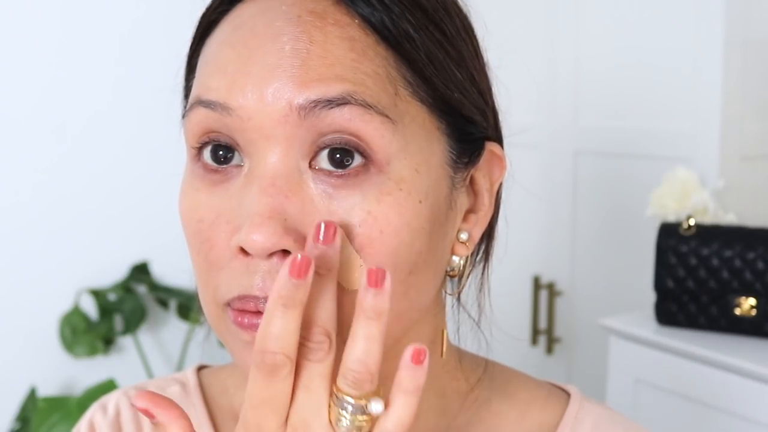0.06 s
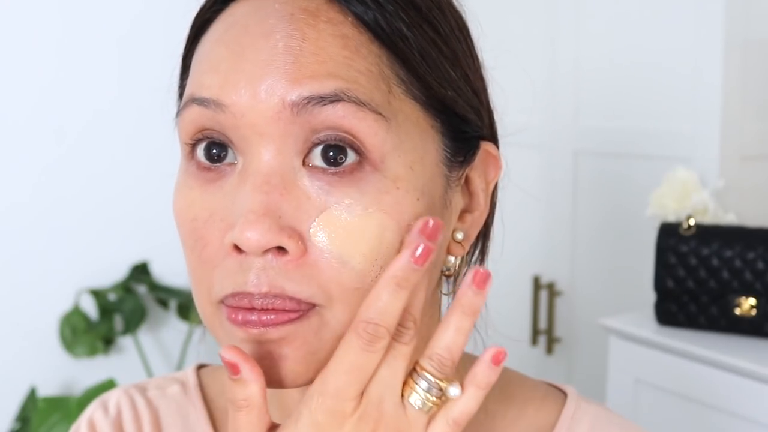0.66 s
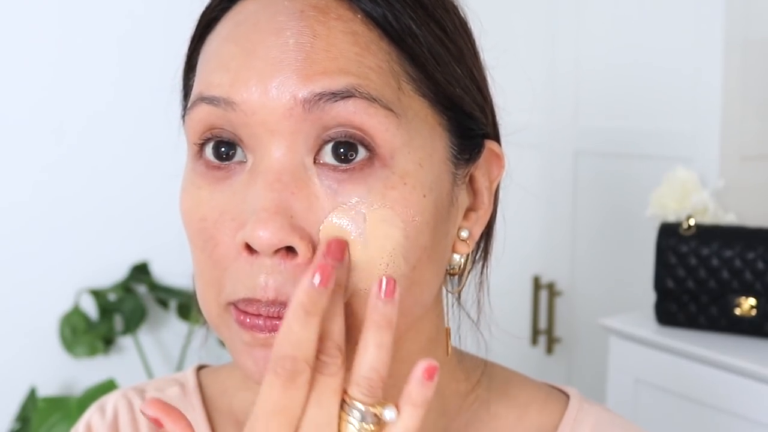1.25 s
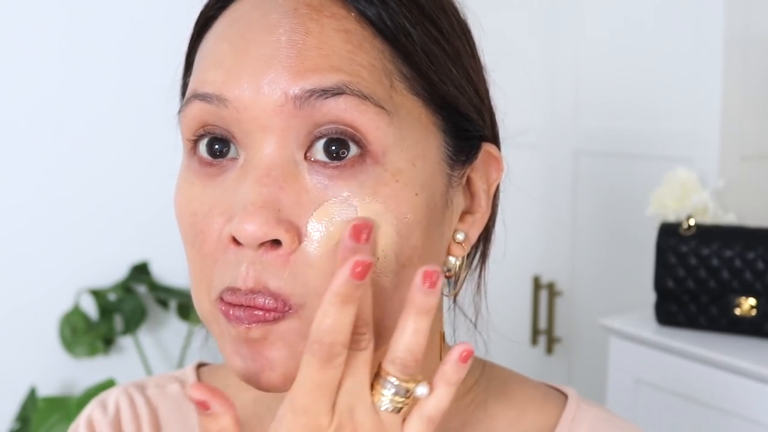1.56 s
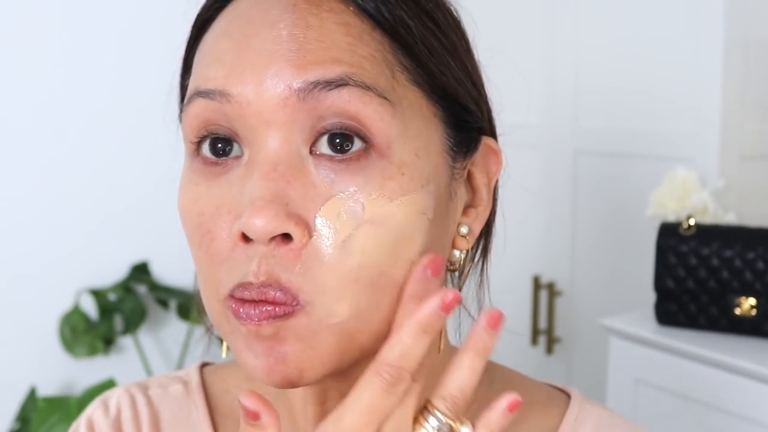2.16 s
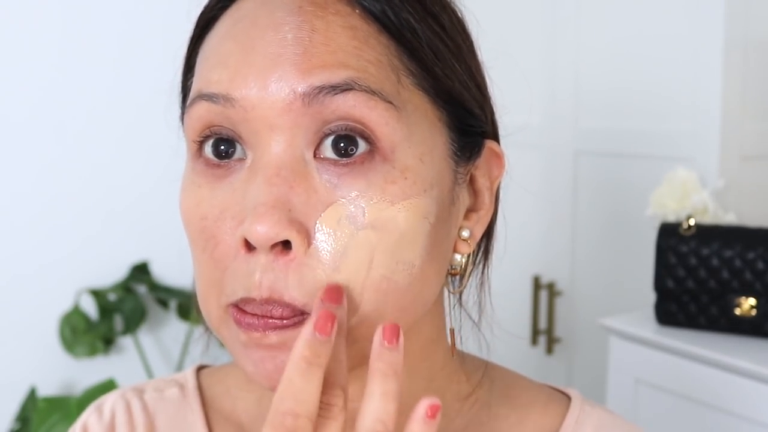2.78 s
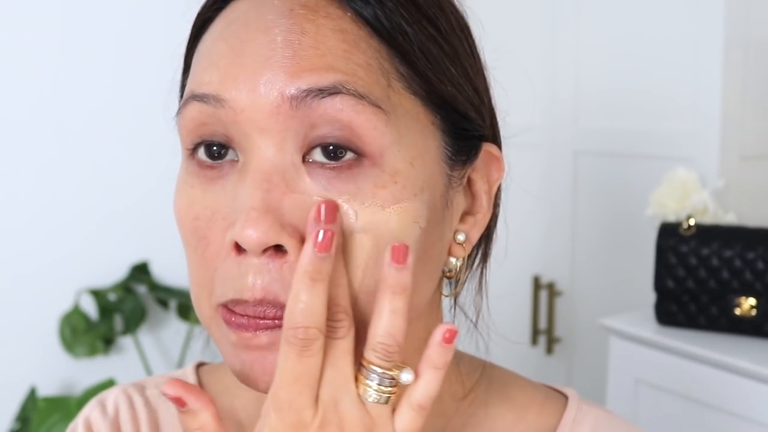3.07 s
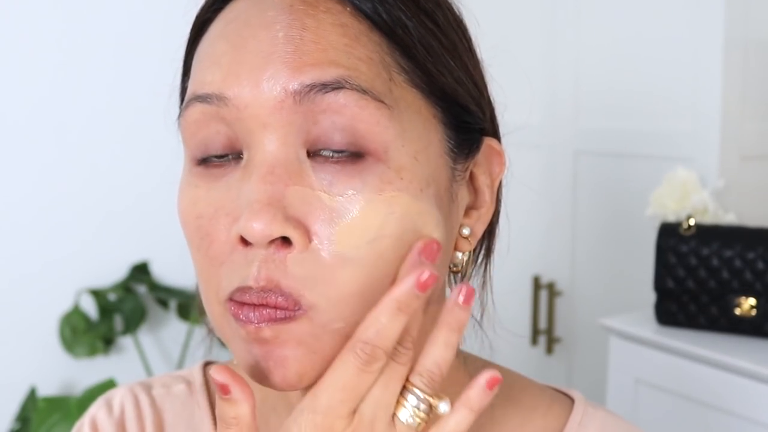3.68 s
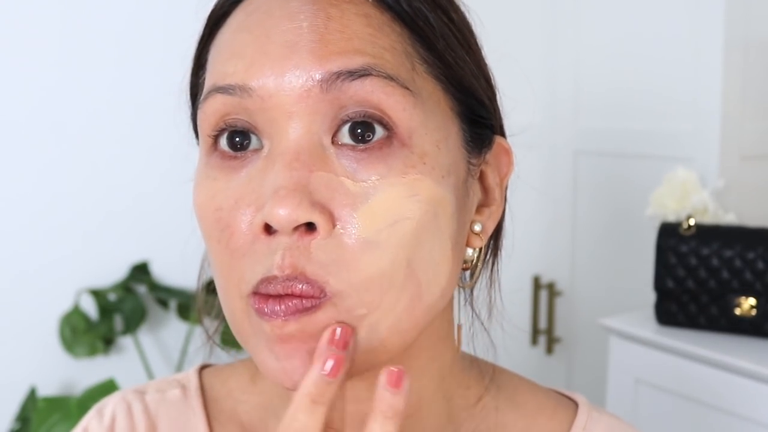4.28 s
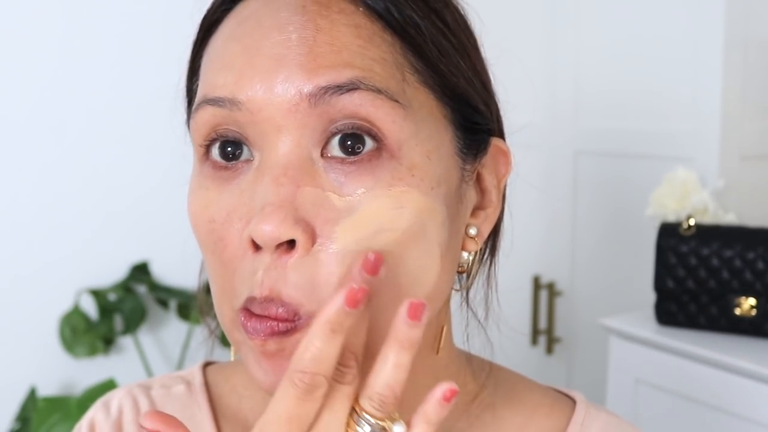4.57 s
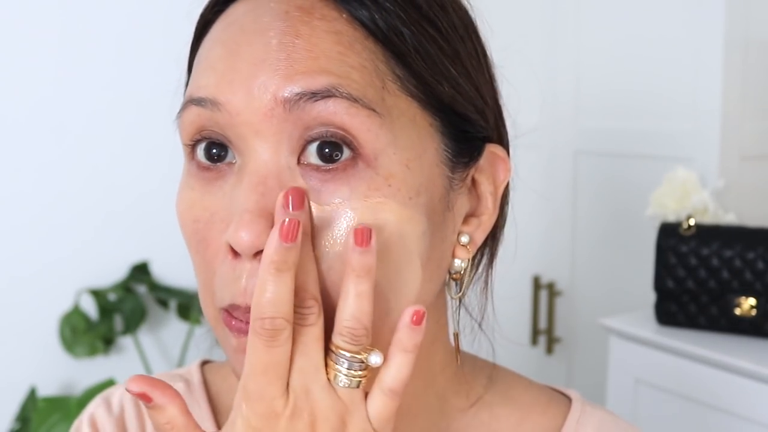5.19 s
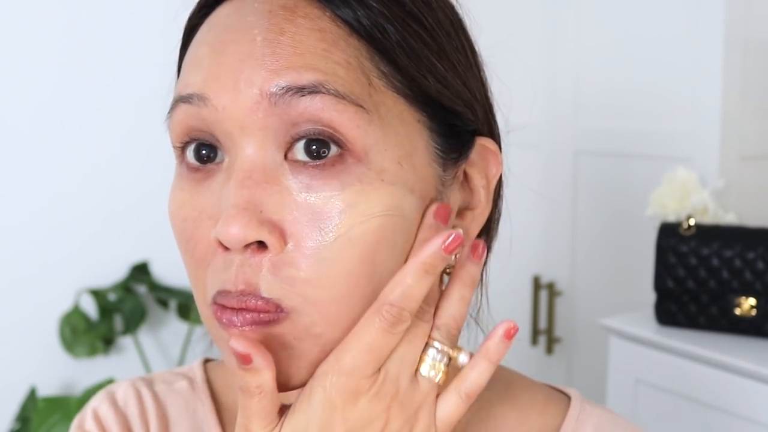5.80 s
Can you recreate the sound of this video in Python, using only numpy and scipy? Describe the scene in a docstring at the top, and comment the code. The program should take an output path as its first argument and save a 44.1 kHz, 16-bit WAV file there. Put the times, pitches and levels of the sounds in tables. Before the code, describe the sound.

A small bottle clicks, scrapes and knocks on a table, then fingertips rub very faintly on skin over a low hum.

```python
"""A small, quiet room, close up: fingertips spread liquid foundation over a cheek.
First, something like a small bottle slides, clicks and bumps on the dressing table; both ring in
damped modes. Then soft strokes hiss on the skin, louder as the hand moves faster, with a few tiny
ticks and squeaks. An appliance hums low under a faint hiss."""
import sys
import numpy as np
from scipy import signal
from scipy.fft import rfft, irfft
from scipy.io import wavfile

SR = 44100
rng = np.random.default_rng(int(sys.argv[2]) if len(sys.argv) > 2 else 0)


def persist_wave(psi):
    """Save psi, clipped to +-1, as 16-bit WAV."""
    counts = np.round(np.clip(psi, -1, 1) * 32767).astype(np.int16)
    wavfile.write(sys.argv[1], SR, np.atleast_2d(counts).T)


N = 257544
T = np.arange(N) / SR
FREQS_HZ = np.fft.rfftfreq(N, 1 / SR) + 1e-3

# Appliance hum. Each row: frequency in Hz, level in dB.
HUM_PARTIALS = [(59.2, -55.5), (118.4, -71)]
# Noise spectra. Each row: frequency in Hz, relative density in dB.
AIR_SPECTRUM = [(76, -29.5), (130, -3), (320, -4.5), (497, -9), (803, -12.5), (1150, -15.5), (1970, -16.5),
                (2720, -16.5), (2890, -15), (3530, -20), (4220, -18), (5370, -20), (15500, -23.5)]
SKIN_SPECTRUM = [(200, -3), (500, -7), (1200, 2), (2000, -3), (3200, -3), (5000, -3), (8000, -5.5),
                 (13000, -9.5), (16000, -20)]
ROOM_RUMBLE_SPECTRUM = [(20, -12), (60, 2), (130, -4), (300, -9.5), (900, -48.5)]
CHANNEL_HISS_SPECTRUM = [(30, 14), (150, 10), (600, 5), (2500, -5.5), (14000, -2)]
TABLE_RUMBLE_SPECTRUM = [(30, -17), (80, -4.5), (170, -16), (300, -30), (900, -20.5), (2000, -32.5)]
# Room decay. Each row: band centre in Hz, T60 in seconds, gain in dB.
ROOM_BANDS = [(90.2, .45, -3.5), (200.6, .35, -5), (455.3, 0.4, -4.5), (800, 0.55, -3.5),
              (1300, 0.36, -5.5), (1900, 0.37, -13), (2980, 0.5, -11.5), (4603, 0.44, -18.5),
              (6497, 0.33, -20.5), (13000, 0.24, -22.5)]
# Modes of table top and bottle. Each row: frequency in Hz, relative level in dB, T60 in seconds.
TABLE_MODES = [(75.4, -13, 0.3), (106, -6, 0.11), (136, -7, 0.13), (178.84, -4.5, 0.14),
               (234.7, -25.5, 0.31), (336.3, -3.5, 0.022), (403, 3, 0.016), (510, -9, .016),
               (719, -8, 0.0083), (1061, -13.5, .008)]
BOTTLE_MODES = [(1390, -23, .02), (1850, -16, 0.033), (2447, -23, .012), (3080, 2, .009), (3584, 9, 0.0074),
                (4254, 1.5, .005), (4930, -10.5, 0.0043), (7040, -7.5, 0.014), (12470, -25.5, .008),
                (14100, -38.5, .02)]
# Blows on the table. Each row: start in seconds, gain in dB, contact in seconds, relative room send in dB.
TABLE_BUMPS = [(0.079, -36.5, 0.0033, -11), (0.282, -13.5, 0.0039, -16.5), (0.552, 0.5, 0.001, -13.5),
               (0.7067, -9.5, 0.0042, -14.5), (3.5293, -47, .0005, -6.5)]
# Resonances of the dragged bottle. Each row: centre in Hz, width in Hz, relative gain in dB.
SCRAPE_BANDS = [(1400, 400, -11.5), (1847, 150, 2), (2971, 440, -2), (3650, 500, -5.5), (4700, 530, -2.5),
                (6456, 690, 0), (7650, 980, -6)]
# Tone of the scrape. Each row: frequency in Hz, relative gain in dB.
SCRAPE_EQ = [(500, -12.5), (1600, -1.5), (8000, 2.5), (9500, 4.5), (15000, -2)]
# Drags of the bottle's base. Each row: start in seconds, length in seconds, midpoint level in dB,
# trend in dB per second, tilt in dB per octave, attack in seconds.
BOTTLE_SLIDES = [(0, 0.3, -57.5, 11, -5.5, 0.013), (0.479, 0.081, -32.5, 215, -1.1, .018),
                 (.662, 0.19, -43, -84, 0.5, 0.062)]
# Hard clicks of the bottle. Each row: start in seconds, peak level in dB.
BOTTLE_CLICKS = [(0.2639, -28), (0.2655, -22.5), (0.2681, -8), (0.2702, -15.5), (0.27, -25)]
# Ticks of nails, rings and sticky skin. Each row: start in seconds, gain in dB, resonance in Hz,
# width in Hz, relative crack gain in dB.
FINGER_TICKS = [(0.9682, -59.5, 4687, 1498, -4.5), (2.1106, -51, 12670, 400, 2),
                (2.375, -62, 12500, 1500, -1), (2.742, -60, 5000, 2000, -3),
                (3.5303, -44.5, 1148, 500, -28), (3.638, -46, 2750, 700, -26), (3.664, -51, 13400, 2000, 5),
                (3.9588, -52, 13200, 500, 6), (4.2767, -49, 6430, 250, -3), (4.279, -51.5, 12500, 300, 6)]
# Faint squeaks. Each row: start in seconds, length in seconds, pitch in Hz, level in dB.
SKIN_SQUEAKS = [(1.85, 0.12, 1280, -63.5), (1.86, 0.11, 520, -64), (5.645, 0.038, 1306, -61),
                (5.71, 0.083, 1350, -64.5), (5.802, 0.046, 1260, -64)]
# Strokes on the cheek. Each row: start in seconds, length in seconds, level in dB, relative drag in dB.
FINGER_STROKES = [(.85, .14, -75, -1), (0.958, 0.15, -66.5, -2.5), (1.17, 0.28, -69, 0),
                  (1.467, 0.13, -70, -3), (1.573, .28, -58, -3), (1.835, 0.19, -63, -.5),
                  (1.993, 0.29, -64, -2), (2.337, 0.2, -67.5, -2.5), (2.599, 0.21, -72, -2),
                  (2.81, 0.17, -65, -2.5), (3.002, .11, -76.5, -2), (3.173, 0.16, -65, -3.5),
                  (3.381, .21, -65.5, -1.5), (3.616, 0.12, -64.5, -2), (3.7, 0.19, -64.5, -1.5),
                  (3.919, .27, -61.5, -3), (4.27, 0.28, -72.5, -8), (4.49, 0.13, -64, 1.5),
                  (4.55, .18, -64, -1.5), (4.767, 0.097, -70.5, 2.5), (4.991, 0.062, -62, 0.5),
                  (5.019, .13, -64.5, -4.5), (5.383, .3, -62.5, -3), (5.755, .2, -67.5, 1.5)]


def undb(db):
    """Decibels to gain."""
    return 10 ** (np.asarray(db) / 20)


def unit(x):
    """Scale to unit RMS."""
    return x / np.sqrt(np.mean(x ** 2))


def colour(x, points):
    """Filter by a curve of (Hz, dB) points, then scale to unit RMS."""
    hz, db = np.transpose(points)
    gain = undb(np.interp(np.log(FREQS_HZ), np.log(hz), db))
    return unit(irfft(rfft(x) * gain, N))


def resonate(x, hz, width_hz):
    """One resonance, unity gain at its centre."""
    return signal.lfilter(*signal.iirpeak(hz, hz / width_hz, fs=SR), x)


def ring(hz, t60_s):
    """A struck mode; the longer its decay, the slower its onset."""
    t = T[:SR // 2]
    swell = 1 - np.exp(-t / (0.018 * t60_s))
    return -np.cos(2 * np.pi * hz * t) * swell * np.exp(-np.log(1000) * t / t60_s)


def add(track, start_s, sound):
    """Mix a sound into the track."""
    start = int(start_s * SR)
    track[start:start + len(sound)] += sound[:N - start]


def friction(spread_db):
    """Tiny slips of unequal size: noise with a new random level every 32 samples."""
    noise = rng.standard_normal(N)
    slip_db = spread_db * np.repeat(rng.standard_normal(N // 32 + 1), 32)[:N]
    return unit(noise * undb(slip_db))


def hand_speed(start_s, length_s):
    """One movement: a half sine from rest to 1 and back."""
    phase = np.interp(T, [start_s, start_s + length_s / 2, start_s + length_s], [0, 1, 0])
    return np.sin(np.pi / 2 * phase)


def background():
    """Appliance hum, room air and rumble; each channel adds its own hiss."""
    hum = sum(undb(db) * np.sqrt(2) * np.sin(2 * np.pi * hz * T + rng.uniform(0, 2 * np.pi))
              for hz, db in HUM_PARTIALS)
    air = undb(-63) * colour(rng.standard_normal(N), AIR_SPECTRUM)
    rumble = undb(-70.5) * colour(rng.standard_normal(N), ROOM_RUMBLE_SPECTRUM)
    hiss = [colour(rng.standard_normal(N), CHANNEL_HISS_SPECTRUM) for _ in range(2)]
    return hum + air + rumble + undb(-67.5) * np.array(hiss)


def room(x, predelay_s=0.005, build_s=0.0034):
    """Diffuse wall echoes: a fresh noise response, each band with its own decay."""
    hz, t60_s, db = np.transpose(ROOM_BANDS)
    spectrum, t = rfft(rng.standard_normal(N)), T[:SR]
    response = 0
    for k, share in enumerate(np.eye(len(hz))):
        band = irfft(spectrum * np.interp(np.log(FREQS_HZ), np.log(hz), share), N)[:SR]
        decay_per_s = np.log(1000) / t60_s[k]
        envelope = np.exp(-decay_per_s * t) * np.sqrt(2 * decay_per_s / SR)  # unit energy
        response += undb(db[k]) * band * envelope
    arrival = np.clip((t - predelay_s) / build_s, 0, 1)
    return signal.fftconvolve(x, response * arrival)[:N]


def table_bumps():
    """Blows ring the table top; longer contact leaves only low modes. Returns direct sound, room send."""
    direct, send = np.zeros(N), np.zeros(N)
    top = sum(undb(db) * ring(hz, t60_s) for hz, db, t60_s in TABLE_MODES)
    # A small board radiates no deep bass.
    top = signal.sosfilt(signal.butter(4, 55, "high", fs=SR, output="sos"), top)
    for start_s, db, contact_s, send_db in TABLE_BUMPS:
        force = np.sin(np.pi * np.minimum(T[:SR // 50] / contact_s, 1)) ** 2
        thud = undb(db) * signal.fftconvolve(top, force / force.sum())
        add(direct, start_s, thud)
        add(send, start_s, thud * undb(send_db))
    return direct, send


def bottle_slides(release_share=0.14):
    """Slips of the base excite the bottle and rumble in the table; each slide swells or fades."""
    slips = friction(spread_db=2.5)
    rumble = undb(-13) * colour(friction(spread_db=9.5), TABLE_RUMBLE_SPECTRUM)
    out = np.zeros(N)
    for start_s, length_s, mid_db, trend_db_per_s, tilt_db_per_oct, attack_s in BOTTLE_SLIDES:
        scrape = 0
        for k, (hz, width_hz, db) in enumerate(SCRAPE_BANDS):
            gain = undb(db + tilt_db_per_oct * np.log2(hz / 4500))
            scrape += (-1) ** k * gain * resonate(slips, hz, width_hz)
        age_s = np.clip(T - start_s, 0, length_s)
        attack = np.minimum(age_s / attack_s, 1) ** 2
        release = np.clip((start_s + length_s - T) / (release_share * length_s), 0, 1)
        level = undb(mid_db + trend_db_per_s * (age_s - length_s / 2))
        out += attack * release * level * (colour(scrape, SCRAPE_EQ) + rumble)
    return out


def bottle_clicks():
    """The bottle chatters against something hard; each hit rings its modes."""
    out = np.zeros(N)
    body = sum(undb(db) * ring(hz, t60_s) for hz, db, t60_s in BOTTLE_MODES)
    for start_s, db in BOTTLE_CLICKS:
        add(out, start_s, undb(db) * body / np.abs(body).max())
    return out


def finger_ticks(decay_s=0.003):
    """Each tick is a short crack that excites one damped resonance."""
    out, t = np.zeros(N), T[:SR // 4]
    for start_s, db, hz, width_hz, crack_db in FINGER_TICKS:
        burst = rng.standard_normal(len(t)) * np.exp(-t / decay_s)
        body = resonate(burst, hz, width_hz) * np.sqrt(SR / (np.pi * width_hz))
        crack = undb(crack_db) * resonate(burst, hz=4400, width_hz=6200)
        add(out, start_s, undb(db) * (body + crack))
    return out


def skin_squeaks(width_hz=130):
    """Wavering squeaks, perhaps of skin catching: slips in a narrow resonance."""
    slips = friction(spread_db=2)
    out = np.zeros(N)
    for start_s, length_s, hz, db in SKIN_SQUEAKS:
        tone = unit(resonate(resonate(slips, hz, width_hz), hz, width_hz))
        out += undb(db) * hand_speed(start_s, length_s) * tone
    return out


def finger_strokes(speed_exponent=0.75, rest_db=-77, rest_drag_db=-3):
    """Wet fingertips hiss on the cheek, louder with speed; firmer drag lifts a band near 3 kHz."""
    hiss_power = np.full(N, undb(rest_db) ** 2)  # light contact between strokes
    drag_power = hiss_power * undb(rest_drag_db) ** 2
    for start_s, length_s, db, drag_db in FINGER_STROKES:
        power = (undb(db) * hand_speed(start_s, length_s) ** speed_exponent) ** 2
        hiss_power += power
        drag_power += power * undb(drag_db) ** 2
    hiss = colour(friction(spread_db=0.5), SKIN_SPECTRUM)
    drag = resonate(friction(spread_db=1), hz=2890, width_hz=1100)
    drag = unit(resonate(drag, hz=3130, width_hz=1500))
    return np.sqrt(hiss_power) * hiss + np.sqrt(drag_power) * drag


def scene():
    """Bottle and fingers, close and centred, over the background; the echoes spread a little."""
    bumps, bump_send = table_bumps()
    clicks, slides = bottle_clicks(), bottle_slides()
    fingers = finger_strokes() + skin_squeaks() + finger_ticks()
    direct = bumps + clicks + slides + fingers
    send = undb(6.5) * bump_send + undb(2.5) * clicks + slides + undb(-3) * fingers
    # Closely spaced capsules differ more as frequency rises.
    side = undb(-16) * np.diff(room(send), prepend=0)
    return direct + room(send) + np.array([side, -side]) + background()


def record(dry):
    """Steep low-pass on the top treble."""
    cutoff_hz = 15800
    return signal.sosfilt(signal.ellip(10, 0.1, 80, cutoff_hz, fs=SR, output="sos"), dry)


dry = scene()
out = record(dry)
persist_wave(out)
```